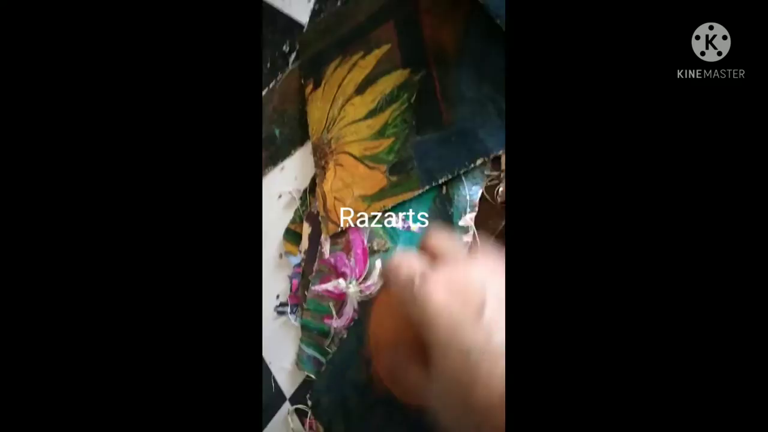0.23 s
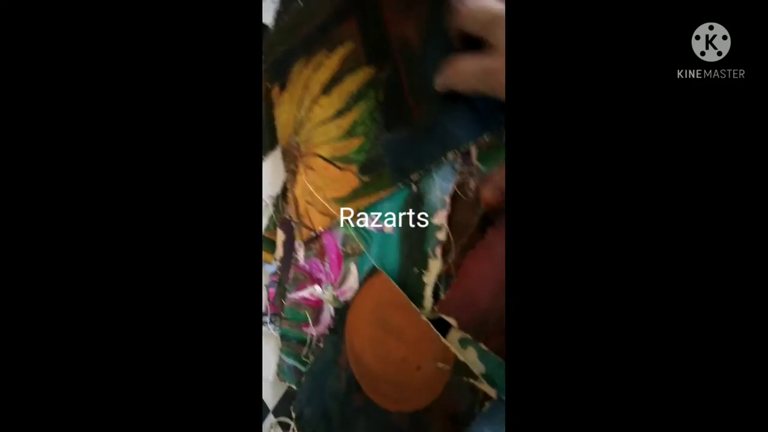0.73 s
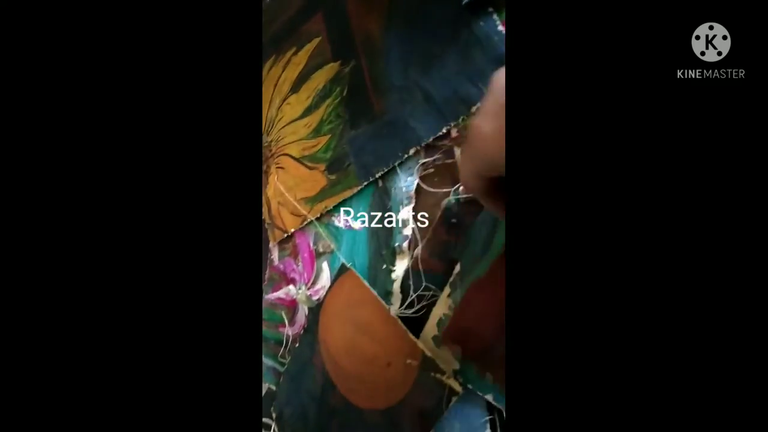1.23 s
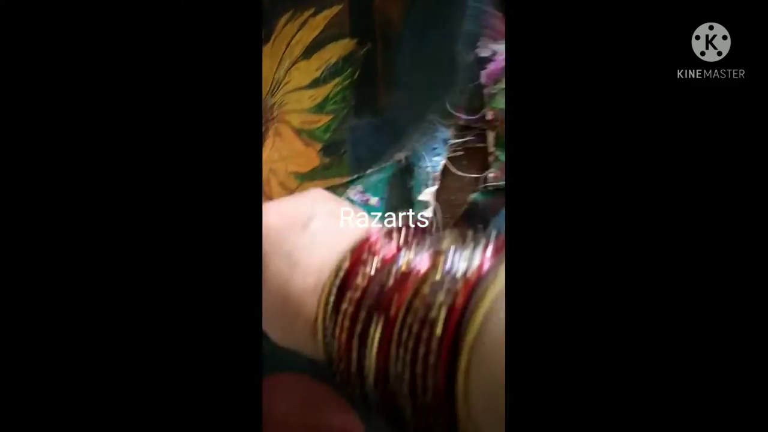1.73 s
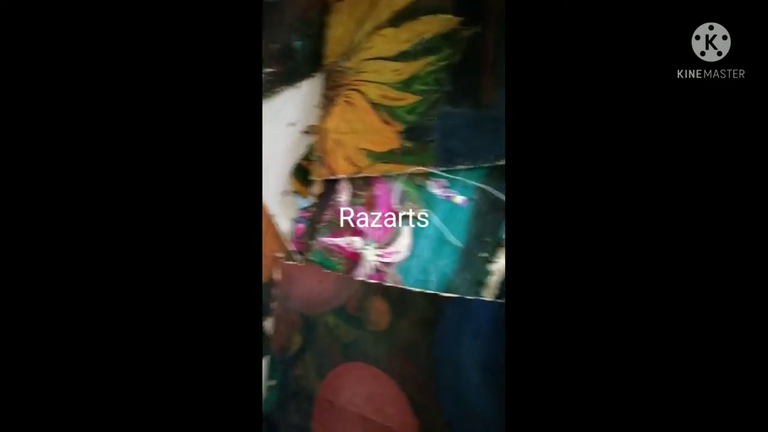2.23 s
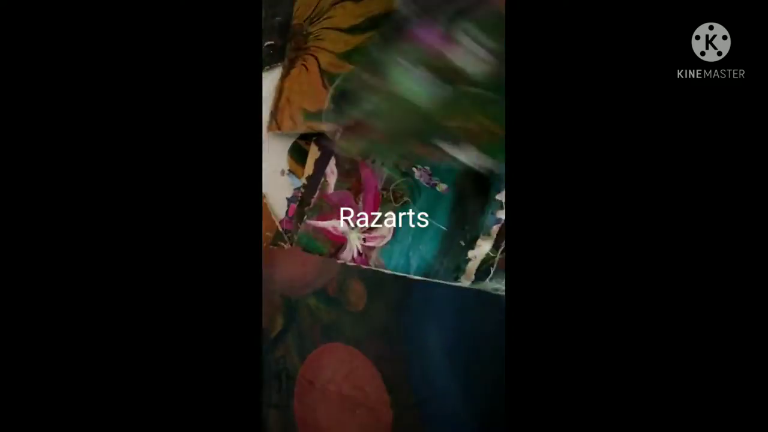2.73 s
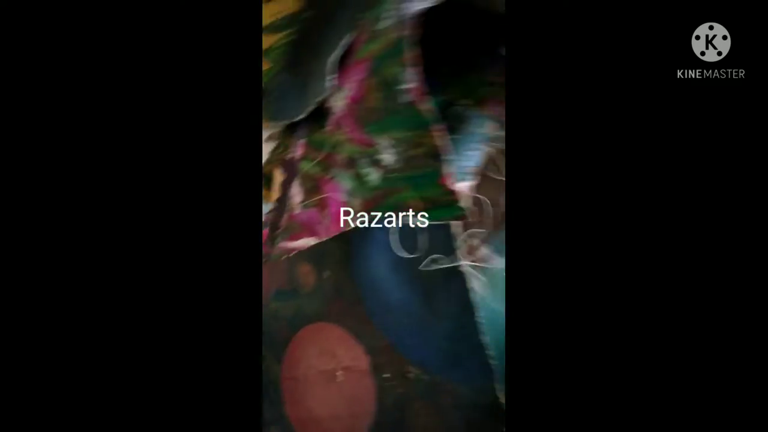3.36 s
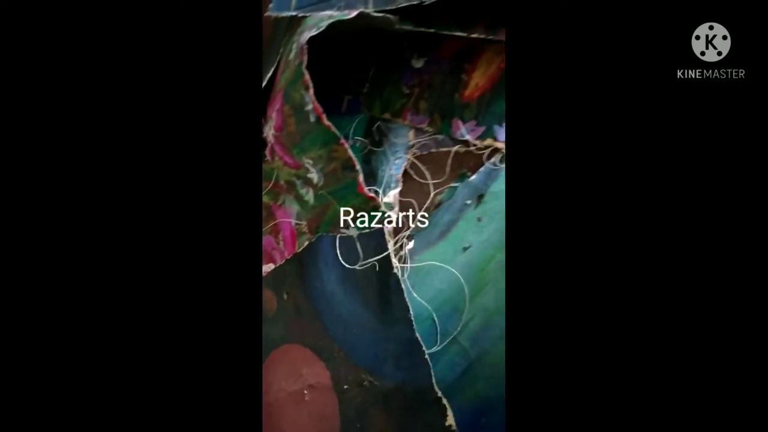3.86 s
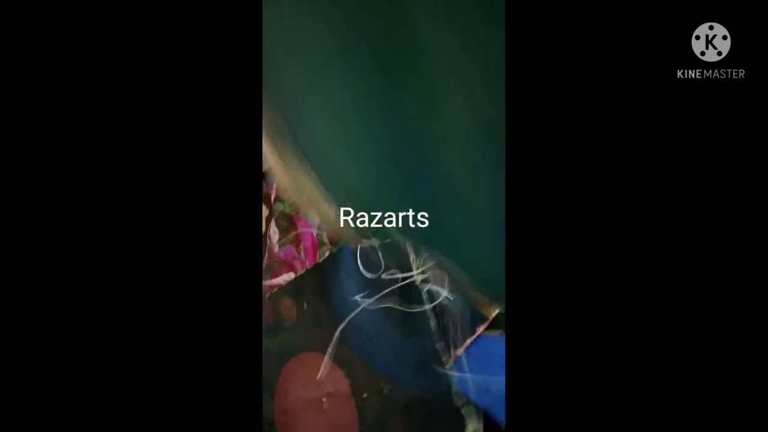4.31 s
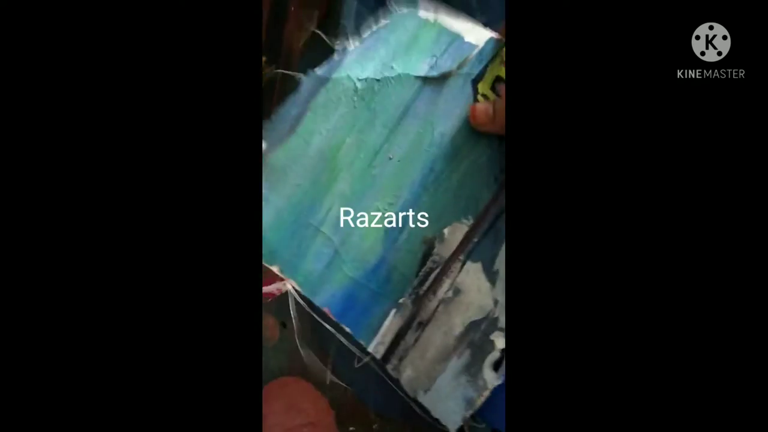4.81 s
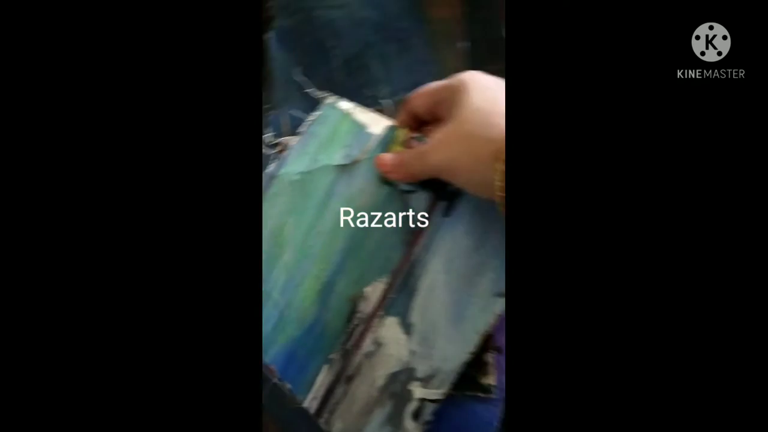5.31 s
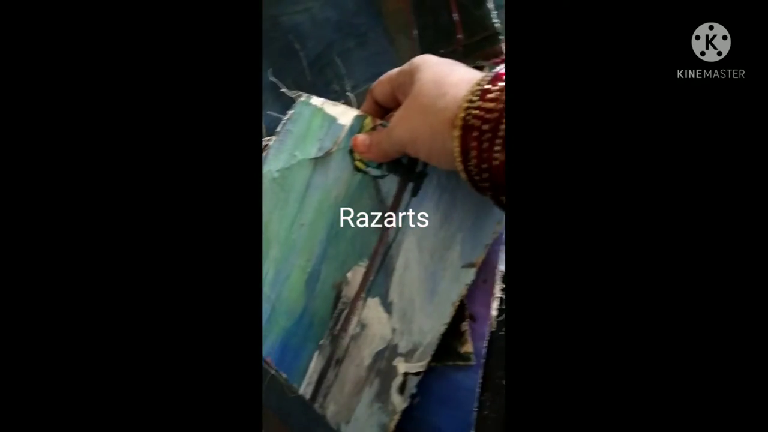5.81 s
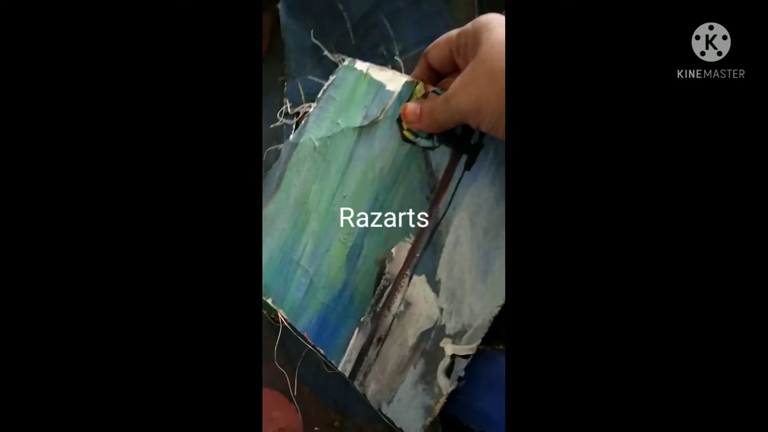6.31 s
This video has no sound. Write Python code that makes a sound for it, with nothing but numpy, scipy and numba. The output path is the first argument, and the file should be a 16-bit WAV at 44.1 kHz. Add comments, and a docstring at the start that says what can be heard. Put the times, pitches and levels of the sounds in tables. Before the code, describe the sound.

Silence for about 0.35 seconds, then a quick fade-in to a small room with a low, soft drone and faint motor hum. Stiff painted canvas is dragged close to a stereo microphone in irregular hissing, scraping tugs. A bird whistles outside at 0.55-0.85, slightly echoing. Hard dry snaps come at 1.05-1.25, with low sheet knocks near 0.9 and 1.2. From 1.83 to 2.3 thin glass bangles rattle past in one bright, dense rush. Scratchy rubs and small knocks continue; thread and paint-crust snaps gather from 2.9, crisp and mostly left, busiest at 3.5-4.3. The bird calls again at 4.4-4.65. A firmer double thump lands at 4.74 with more crackles, then handling dwindles after 5.0. A tiny last tick at 5.25 leaves only quiet room drone until the end around 6.5.

```python
"""Stiff painted canvas is pulled in scraps from a pile, close up: banded click noise hisses and scrapes under drag and tugs.
Fibres and paint crust snap as short rings, sheets thump as low knocks, and glass bangles rattle past once as a rush of rings.
A bird calls twice outside the window in gliding sines, over a room drone of coloured noise and hum.
After a silent start the sound fades in."""
import sys
import numpy as np
from scipy import signal
from scipy.fft import rfft, irfft
from scipy.io import wavfile
from scipy.ndimage import uniform_filter1d
from numba import njit

SR = 44100
rng = np.random.default_rng(int(sys.argv[2]) if len(sys.argv) > 2 else 0)


def persist_wave(psi):
    """Save psi, clipped to +-1, as 16-bit WAV."""
    counts = np.round(np.clip(psi, -1, 1) * 32767).astype(np.int16)
    wavfile.write(sys.argv[1], SR, np.atleast_2d(counts).T)


N = 289966


def undb(db):
    """Decibels to gain."""
    return 10 ** (np.asarray(db) / 20)


def unit(x):
    """Scale to rms 1."""
    return x / np.sqrt(np.mean(x ** 2))


def curves(table):
    """Columns joined by straight lines, one value a sample."""
    s, *columns = np.transpose(table)
    return [np.interp(np.arange(N) / SR, s, c) for c in columns]


def band(x, lo_hz, hi_hz, order=2):
    """Band-pass along time."""
    return signal.sosfilt(signal.butter(order, [lo_hz, hi_hz], "band", fs=SR, output="sos"), x)


def walk(rate):
    """Random levels held 1 / rate s and slewed twice; spread near 1."""
    k = int(SR / rate)
    steps = np.repeat(rng.standard_normal(N // k + 1), k)
    return 1.15 * uniform_filter1d(uniform_filter1d(steps, k), k)[:N]


def add(out, s, rise_s, fall_s, gain, bluntness):
    """Add a swell that peaks at s; rise and fall are the times of one e-fold."""
    first = max(int((s - 6 * rise_s) * SR), 0)
    last = min(int((s + 6 * fall_s) * SR), N)
    t = np.arange(first, last) / SR - s
    swell = np.exp(-np.where(t < 0, -t / rise_s, t / fall_s) ** bluntness)
    out[..., first:last] += gain[..., None] * swell


def tail(x, t60, wet_db):
    """Dry sound plus a dense decay, different at each port."""
    t = np.arange(int(t60 * SR)) / SR
    decay = np.exp(-np.log(1000) * t / t60)
    echo = unit(rng.standard_normal((2, len(t))) * decay) / np.sqrt(len(t))
    return x + undb(wet_db) * signal.fftconvolve(x * np.ones((2, 1)), echo, axes=1)[:, :N]


@njit
def rings(n, start, hz, t60, rise, left, right):
    """Sines that build up for rise s and then decay, one for each grain."""
    out = np.zeros((2, n))
    for g in range(len(start)):
        decaying_turn = np.exp(2j * np.pi * hz[g] / SR - np.log(1000.) / (t60[g] * SR))
        steady_turn = np.exp(2j * np.pi * hz[g] / SR)
        up = int(rise[g] * SR)
        z = 1. + 0j
        for i in range(start[g] - up, min(n, start[g] + int(t60[g] * SR))):
            z *= steady_turn if i < start[g] else decaying_turn
            y = z.imag * min(1., (i - start[g] + up + 1.) / (up + 1.)) ** 2
            out[0, i] += left[g] * y
            out[1, i] += right[g] * y
    return out


LEFT_LAG_S = 0.00018  # arrival of the shared clicks


def crackle(spread_db, alike, count):
    """Dense clicks of uneven size; part reaches both ports, the left a little later."""
    clicks = np.zeros((3, N))  # left alone, right alone, shared
    chance = rng.standard_normal((3, count))
    places = rng.integers(0, N, (3, count))
    size = chance * undb(spread_db * np.minimum(rng.exponential(size=chance.shape), 3.3))
    np.add.at(clicks, (np.arange(len(clicks))[:, None], places), size)
    both = np.array([np.roll(clicks[-1], int(LEFT_LAG_S * SR)), clicks[-1]])
    alike = np.clip(alike, 0, 1)
    return np.sqrt(1 - alike) * clicks[:-1] + np.sqrt(alike) * both


# registers of the fibre hiss, each with a flicker of its own: low_hz [Hz], high_hz [Hz], level_db [dB]
HISS_REGISTERS = [(4050, 6360, -9.5), (6460, 9970, -4), (10500, 16500, -5.5)]


def canvas():
    """Stick-slip crackle of the weave in several registers; breaking fibres click in all of them at once."""
    high, middle, low = handling() * undb(1.12 * walk(25.164))
    fibres = unit(crackle(3.8, 0.28, count=12000)) * undb(2.0 * walk(60))

    def weave(share, spread_db, alike, count):
        """Common fibre clicks plus a crackle of the register's own."""
        return share * fibres + unit(crackle(spread_db, alike, count=count))

    grit = weave(.75, 3.8, .25, count=45000) * undb(1.5 * walk(45) + 1.5 * walk(220))
    hiss = 0
    for k, (low_hz, high_hz, level_db) in enumerate(HISS_REGISTERS):
        register = unit(band(grit, low_hz, high_hz)) * undb(level_db + 1.8 * walk(35))
        hiss = hiss + (-1) ** k * register  # polarity alternates between registers
    scrape = -unit(band(weave(0.54, 1.8, 0.26, count=40000), 2130, 4380)) * undb(3.15 * walk(40))
    rasp = unit(band(weave(0.58, 2.6, 0.24, count=20000), 1410, 1880)) * undb(-11.0 + 3.0 * walk(22))
    body = unit(band(weave(0.53, 3.6, 0.7, count=16000), 427, 1430)) * undb(2.2 * walk(29.92))
    flap = unit(band(crackle(1.6, 1.0, count=4000), 152, 355)) * undb(-7.5 + 4.7 * walk(11))
    rub = swishes() * (scrape + undb(1.0) * hiss + undb(-4.5) * body)
    creases = crumple(middle.mean(axis=0))
    return high * hiss + middle * scrape + low * (body + flap + rasp) + rub + creases


# steady drag of the sheet over the pile:
# time_s [s], hiss_db [dB], scrape_over_hiss_db [dB], body_over_hiss_db [dB]
DRAG_CURVE = [(0.44, -53.5, -4, -10), (0.72, -43.5, 11, -4.5), (0.84, -48, 0, -7), (1.0, -45.5, -32, 2.5),
              (1.25, -43, 1.5, -7), (1.6, -49.5, 5, 0.5), (1.85, -52, 3, -5), (2.15, -53, 12.5, -23),
              (2.3, -44.5, 0.5, -2), (2.6, -41.5, 3.5, -3), (3.1, -46.5, 0.5, -0.5), (3.5, -52.5, -3, -13),
              (3.82, -51.5, 1, -6), (3.9, -43.5, 9, -2.5), (4.1, -42.5, 4, 1.5), (4.3, -45, -2, -6),
              (4.55, -43.5, 5.5, -11), (4.71, -54, 9, 0), (4.9, -48.5, 8, 5), (4.97, -57.5, 9, 11.5),
              (5.04, -57, 6.5, 2), (5.12, -67, 9, 1.5), (5.3, -68.5, 9, -3)]
# tugs at the cloth: peak_s [s], hiss_db [dB], rise_ms [ms], fall_ms [ms],
# scrape_over_hiss_db [dB], body_over_hiss_db [dB], left_minus_right_db [dB]
CLOTH_TUGS = [(0.483, -38, 2.1, 15, -4, -23, -1), (0.643, -32.5, 60, 33, -14, -21.5, -1),
              (0.9, -30, 18, 40, 7.5, -5.5, -0.5), (0.996, -33.5, 4.6, 5.4, -18, -13, -6),
              (1.063, -34.5, 37, 54, 8, -24, 3), (1.227, -35, 11, 2, 2, -15, -2),
              (1.335, -40, 14, 60, 4, -20, 1), (1.425, -33.5, 60, 16, -0.5, -11, 2),
              (1.595, -37, 2.3, 6, 2, -6, -3), (1.656, -41, 18, 20, 0, -3.5, 3),
              (1.781, -37.5, 68, 20, 0, -1.5, 2.5), (1.857, -27, 11, 85, -2, -21, 1),
              (1.992, -47, 42, 85, 5, -38, 5), (2.176, -34, 61, 40, 2.5, -38, -1),
              (2.337, -33, 19, 26, 6.5, -3, 1.5), (2.51, -35, 21, 23, -3, -6.5, -0.5),
              (2.625, -42, 22, 20, 8, -3.5, 0), (2.714, -35, 38, 51, -1.5, -8.5, 0),
              (2.93, -37.5, 6.5, 83, -8, -35, 1), (3.07, -44.5, 85, 8.6, 3.5, -7.5, -1),
              (3.213, -36, 40, 30, 2.5, -5, 0), (3.311, -45, 3.8, 26, 1.5, 7, -2),
              (3.441, -39, 38, 22, 2.5, -1, 1), (3.545, -33, 19, 23, -1.5, -11, 0),
              (3.666, -40.5, 18, 4, 1, 1, -1), (3.772, -43.5, 8.7, 10, 9.5, -8, 0.5),
              (3.864, -37.5, 15, 7.5, 6, -18, 1), (4.118, -43, 3, 12, -18, -8, 2),
              (4.161, -34, 16, 3.2, -5, -4.5, 4), (4.21, -42.5, 21, 35, -2, -12, 4),
              (4.316, -39, 7.9, 7.3, -10, -7, 0), (4.385, -38.5, 26, 35, -7.5, -3.5, -5),
              (4.63, -42.5, 11, 2.4, 3, -25, 4), (4.656, -48, 5.8, 5.7, -1, -27, -1.5),
              (4.735, -42, 1.4, 24, 1, 6.5, -4), (4.789, -36.5, 31, 27, 6.5, -1, 2),
              (4.836, -41.5, 4.9, 36, -9, -18, -6), (4.94, -47, 44, 16, -11, -12, -2),
              (5.234, -63, 3.6, 4, 12, 2, 3)]
TUG_BLUNTNESS = 1.275  # 1 = pointed swell, 2 = round bell


def handling():
    """Gains of hiss, scrape and body at both ports: a steady drag plus the tugs."""
    hiss_db, scrape_db, body_db = curves(DRAG_CURVE)
    dragging = np.arange(N) / SR < DRAG_CURVE[-1][0]
    layers = undb([hiss_db, hiss_db + scrape_db, hiss_db + body_db])
    out = dragging * layers[:, None] * np.ones((2, 1))
    for s, hiss_db, rise_ms, fall_ms, scrape_db, body_db, pan_db in CLOTH_TUGS:
        layers = undb([hiss_db, hiss_db + scrape_db, hiss_db + body_db])
        gain = np.outer(layers, undb([pan_db / 2, -pan_db / 2]))
        add(out, s, max(rise_ms, 1) / 1000, max(fall_ms, 1) / 1000, gain, TUG_BLUNTNESS)
    return out


def crumple(drag, count=1500):
    """Small creases pop while the sheet is dragged, each with its own pitch and length."""
    start = rng.integers(SR // 2, N, count)
    pitch, length, side = rng.standard_normal((count, 3)).T
    hz = np.clip(2800 * np.exp(.6 * pitch), 1500., 12000.)
    t60 = 14 * np.exp(0.5 * length) / hz
    size = drag[start] * undb(-5.0 + 3.0 * np.minimum(rng.exponential(size=count), 3.0))
    return rings(N, start, hz, t60, 2.55 / hz, size * undb(4.3 * side), -size * undb(-4 * side))


# single snaps of threads and paint crust: start_s [s], level_db [dB], ring_hz [Hz],
# left_minus_right_db [dB], ring_cycles [cycles to -60 dB, at least 1], swish_db [dB]
THREAD_SNAPS = [(1.056, -16, 3360, -2, 18, -33), (1.08, -18, 3000, 1, 10, -38),
                (1.152, -19, 4500, 4, 7, -49), (1.155, -12, 5200, 4, 8, -35),
                (1.182, -32, 2750, -1, 4, -29.5), (1.219, -13, 5100, 7, 7.3, -37),
                (1.5938, -19, 3080, -4, 5.5, -46), (1.766, -23, 2530, 3, 4, -40),
                (2.498, -17.5, 2230, -2, 9.7, -38), (2.862, -30, 2680, 4, 6, -36.5),
                (2.893, -22, 3500, 4, 16, -44), (2.92, -28, 3380, 8, 8, -41), (2.947, -23, 3300, 4, 6, -43),
                (2.978, -23, 3000, 4, 5, -47), (3.0006, -15, 3060, 8, 9.2, -40),
                (3.0848, -20.5, 2650, 7, 11, -33), (3.338, -25, 2600, 2, 5, -41),
                (3.477, -30, 9500, 2, 5, -45), (3.5206, -32, 3690, 2.5, 4, -43),
                (3.553, -12, 3210, 7.5, 22, -42), (3.583, -31, 2300, 5, 5.5, -48),
                (3.602, -27, 3350, 10, 5, -52), (3.615, -25, 5200, 6, 6, -60),
                (3.654, -19, 3370, 14, 4.4, -54), (3.723, -29, 2620, 11, 3, -58),
                (3.7745, -25, 2980, 10.5, 20, -50), (3.811, -20, 6500, 3, 5.5, -42),
                (3.8306, -27, 3400, 10, 3, -41), (3.86, -18, 3600, 6, 11, -40),
                (3.898, -11.5, 3320, 7, 13, -34), (3.9075, -19, 2650, 8, 20, -54),
                (3.914, -21, 2650, 9, 22, -56), (3.937, -11.5, 2240, 3, 3.6, -33.5),
                (4.0042, -16, 2390, 7, 4.6, -39), (4.1177, -15.5, 2770, 4, 8.5, -30),
                (4.163, -11, 4360, 11, 10, -34), (4.194, -26, 7040, -3, 4, -32),
                (4.217, -30, 9000, 0, 4, -41), (4.2963, -26, 4590, 7, 3, -37),
                (4.629, -28, 4950, 3, 4, -46), (4.7377, -18.5, 3000, 7, 8, -53),
                (4.767, -21, 2000, 3, 6, -39), (4.7872, -20.5, 2650, 10, 18, -48),
                (4.836, -13.5, 7900, 13, 7.1, -45), (4.912, -26, 2600, 5, 5.4, -58),
                (4.949, -34, 2300, 3, 5, -58), (4.968, -31, 1500, -2, 3.9, -61),
                (5.2455, -32, 2820, 13, 3.4, -44)]
TICK_DB, OVERTONE_DB, THUD_DB = -18, -13, -23  # parts of a snap against its ring
SNAP_LAG_S = .00005  # left after right


def snaps():
    """Snaps ring a few cycles, with overtone, sharp tick and dull thud, smeared by the folds around."""
    s, db, hz, pan_db, cycles, _ = np.transpose(THREAD_SNAPS)
    t60 = np.maximum(cycles, 1) / hz
    start, left, right = (s * SR).astype(np.int64), undb(db + pan_db / 2), undb(db - pan_db / 2)
    ring = rings(N, start, hz, t60, 1.04 / hz, left, right)
    over = rings(N, start, 2.16 * hz, 0.52 * t60, 3.1 / hz, left, right)
    tick = rings(N, start, 8800.0 + 0 * s, 0.00061 + 0 * s, 0.00035 + 0 * s, left, right)
    thud = rings(N, start, 0.53 * hz, 0.59 * t60, 0.81 / hz, left, right)
    both = ring + undb(OVERTONE_DB) * over + undb(TICK_DB) * tick + undb(THUD_DB) * thud
    lagged = np.array([np.roll(both[0], int(SNAP_LAG_S * SR)), both[1]])
    return tail(lagged, .006, -11)


SWISH_RISE_S, SWISH_FALL_S = .002, .002


def swishes():
    """Gain of the short rub that leads up to each snap and dies after it."""
    out = np.zeros(N)
    for s, *_, swish_db in THREAD_SNAPS:
        add(out, s, SWISH_RISE_S, SWISH_FALL_S, undb(swish_db), 2)
    return out


# sheets knocking on the pile: start_s [s], level_db [dB], ring_hz [Hz]
SHEET_THUMPS = [(0.894, -22, 574), (0.918, -20.5, 627), (1.179, -24.5, 590), (1.889, -27, 348),
                (2.208, -25.5, 588), (2.226, -20.5, 616), (2.335, -21, 1000), (2.5, -23, 975),
                (2.681, -25.5, 646), (2.965, -25, 650), (3.311, -27.5, 674), (3.336, -28, 590),
                (3.762, -28, 345), (4.151, -25.5, 576), (4.244, -25.5, 676), (4.7346, -17, 850),
                (4.739, -16.5, 470), (4.765, -23.5, 667), (4.786, -22.5, 785), (4.866, -29, 880),
                (4.966, -35, 540)]
THUMP_T60_S = 0.022


def thumps():
    """A low knock with a shorter, higher slap on top."""
    s, db, hz = np.transpose(SHEET_THUMPS)
    start, t60 = (s * SR).astype(np.int64), THUMP_T60_S + 0 * s
    knock = rings(N, start, hz, t60, 0.3 / hz, undb(db - 3.0), undb(db + 2.5))
    slap = rings(N, start, 1.45 * hz, 0.24 * t60, 0.44 / hz, undb(db), undb(db))
    return knock + undb(2.5) * slap


# course of the bangle rattle: time_s [s], level_db [dB], middle_pitch_hz [Hz]
BANGLE_RATTLE = [(1.818, -63, 5000), (1.83, -25, 4960), (1.846, -16.5, 5570), (1.852, -11.5, 5930),
                 (1.89, -22.5, 6100), (1.935, -21, 5700), (1.95, -15, 6150), (1.985, -12.5, 6500),
                 (2.02, -17, 6500), (2.085, -24, 5960), (2.11, -18, 5300), (2.145, -16.5, 4800),
                 (2.172, -17.5, 4350), (2.22, -22, 4740), (2.3, -32.5, 4460)]
# ring modes of the glass: pitch_hz [Hz], relative_level_db [dB], t60_s [s, before shortening]
GLASS_MODES = [(3050, 4, 0.03), (3300, 1.5, 0.093), (3780, -5.5, 0.18), (3840, -5, 0.19), (3920, 1, 0.039),
               (4310, -1, 0.27), (4980, -3, 0.13), (4870, -7, 0.083), (5700, -19, 0.068), (5370, -12, 0.14),
               (5800, -1.5, 0.074), (6550, -0.5, 0.13), (6400, -1, 0.21), (7660, -6, 0.098),
               (7170, -0.5, 0.11), (7640, -2.5, 0.073), (8070, -7, 0.066), (9600, -2, 0.085),
               (10200, 1.5, 0.071), (12500, 2, .04)]


def bangles(count=11000):
    """Thin rings clink in a dense rush; those pitched near the middle are struck hardest."""
    level_db, middle_hz = curves(BANGLE_RATTLE)
    first, last = BANGLE_RATTLE[0][0], BANGLE_RATTLE[-1][0]
    start = ((first + (last - first) * rng.random(count)) * SR).astype(np.int64)
    hz, db, t60 = np.array(GLASS_MODES)[rng.integers(0, len(GLASS_MODES), count)].T
    detune, left, right = rng.standard_normal((count, 3)).T
    damped = rng.random(count) < .75  # held against the wrist: a short, loose tick
    hz = np.clip(hz * np.exp(np.where(damped, .15, .003) * detune), 1500., 15000.)
    t60 = np.where(damped, .012, 0.44 * t60)
    off_db = -7 * (np.log(hz / middle_hz[start]) / np.where(damped, .55, .22)) ** 2
    size = undb(level_db[start] + db + off_db + np.where(damped, -9, -12))
    return rings(N, start, hz, t60, 2.5 / hz, size * left, size * right)


# bird notes: start_s [s], length_s [s], first_hz [Hz], held_hz [Hz], last_hz [Hz],
# level_db [dB, before the throb], peak_place [0-1 of the length]
BIRD_NOTES = [(0.562, 0.013, 3180, 3290, 3370, -30, 0.5), (.58, 0.043, 3480, 3670, 3660, -30, 0.7),
              (0.612, 0.011, 3390, 3330, 3250, -29.5, 0.4), (0.632, 0.024, 3460, 3170, 3160, -33.5, 0.5),
              (0.678, 0.035, 1990, 2120, 2150, -41.5, 0.7), (0.704, 0.015, 3060, 2960, 2830, -35.5, .5),
              (0.672, .014, 4750, 4600, 4500, -41, .5), (0.723, 0.13, 2710, 2752, 2750, -31, 0.33),
              (0.738, 0.112, 2630, 2650, 2700, -34.5, 0.1), (4.41, 0.046, 3640, 3590, 3480, -36.5, 0.7),
              (4.475, 0.042, 2370, 2385, 2380, -38, 0.4), (4.494, 0.024, 3900, 4110, 4560, -39, 0.1),
              (4.514, 0.024, 3890, 3776, 3620, -31.5, 0.3), (4.524, 0.012, 2880, 2860, 2830, -28, 0.3),
              (4.536, 0.015, 3180, 3140, 3000, -31, 0.3), (4.547, 0.035, 2934, 2947, 2920, -27.5, 0.27),
              (4.582, 0.029, 2900, 2920, 2860, -28, 0.5), (4.61, 0.036, 2515, 2200, 1770, -44, 0.1)]
GLIDE_IN_S, GLIDE_OUT_S = 0.0233, 0.019  # at most half a note each
NOTE_START_DB, NOTE_END_DB = -5.5, -5  # ends of a note against its peak
SLAP_S, SLAP_DB = 0.11, -17  # echo off a facing wall
YARD_T60_S, YARD_DB = .3, -1


def bird():
    """Whistles glide into and out of a held pitch, waver and throb, blurred by the walls outside."""
    out = np.zeros(N)
    waver = 1 + .014 * walk(260)
    throb = undb(6 + walk(60) + 2.5 * walk(200) + 3 * walk(1200))
    for s, length, first_hz, held_hz, last_hz, db, peak in BIRD_NOTES:
        t = np.arange(int(length * SR)) / SR
        now = slice(int(s * SR), int(s * SR) + len(t))
        glides = [0, min(GLIDE_IN_S, length / 2), length - min(GLIDE_OUT_S, length / 2), length]
        hz = np.interp(t, glides, [first_hz, held_hz, held_hz, last_hz])
        arc = [0, np.clip(peak, .05, .95), 1]
        level_db = db + np.interp(t / length, arc, [NOTE_START_DB, 0, NOTE_END_DB])
        gate = np.clip(np.minimum(t, length - t) / 0.0016, 0, 1)
        whistle = np.sin(2 * np.pi * np.cumsum(hz * waver[now]) / SR)
        out[now] += gate * throb[now] * undb(level_db) * whistle
    out = out + undb(SLAP_DB) * np.roll(out, int(SLAP_S * SR))
    return tail(out * undb(np.array([[1.5], [-1.5]])), YARD_T60_S, YARD_DB)


# colour of the room drone: pitch_hz [Hz], relative_density_db [dB per Hz]
ROOM_COLOUR = [(18, -91), (30, -48), (70, -25), (86, -44), (145, -12), (170, -12), (204, 0), (415, -9.5),
               (461, -17), (866, -17), (1350, -23), (1760, -19.5), (2750, -27), (13000, -35.5),
               (16000, -33.5)]
# how alike the drone is at the two ports: pitch_hz [Hz], likeness [0-1]
PORT_LIKENESS = [(60, 0.9), (130, 0.95), (290, 0.91), (640, 0.25), (1410, 0), (3100, 0.27), (6820, 0),
                 (15000, 0.45)]
# motor droning on the mains: pitch_hz [Hz], level_db [dB rms, before the waver]
MOTOR_HUM = [(100, -77), (202, -63), (301, -68.5)]
ROOM_DB, HUM_WAVER_DB = -47, 3.0


def room():
    """Coloured drone, alike at both ports in the bass, with an unsteady motor hum."""
    log_f = np.log(np.maximum(np.fft.rfftfreq(N, 1 / SR), 1))
    colour_hz, colour_db = np.transpose(ROOM_COLOUR)
    colour = undb(np.interp(log_f, np.log(colour_hz), colour_db))
    alike_hz, likeness = np.transpose(PORT_LIKENESS)
    alike = np.clip(np.interp(log_f, np.log(alike_hz), likeness), 0, 1)
    mid, side = rfft(rng.standard_normal((2, N)))
    pair = np.sqrt(1 + alike) * mid + np.sqrt(1 - alike) * side * np.array([[1], [-1]])
    out = unit(irfft(colour * pair, N)) * undb(ROOM_DB + 0.81 * walk(1.465))
    t = np.arange(N) / SR
    for hz, db in MOTOR_HUM:
        level = undb(db + HUM_WAVER_DB * walk(12.0))
        out = out + level * np.sqrt(2) * np.sin(2 * np.pi * hz * t)
    return out


LOW_CUT_HZ = 167


def scene():
    """Near sounds lose their deepest bass and get a little of the small room."""
    near = canvas() + snaps() + thumps() + bangles()
    near = signal.sosfilt(signal.butter(3, LOW_CUT_HZ, "high", fs=SR, output="sos"), near)
    return tail(near, 0.22, -11.5) + bird() + room()


# colour of the microphone ports: centre_hz [Hz], width_hz [Hz], left_minus_right_db [dB]
PORT_COLOURS = [(604, 92, -10), (3200, 810, 4.5)]
START_S, FADE_S, TOP_HZ = 0.34, 0.15, 15800


def record(dry):
    """Port colours, a fade-in from silence and the top cut."""
    out = dry
    for hz, width_hz, db in PORT_COLOURS:
        peak = band(out, hz - width_hz / 2, hz + width_hz / 2, order=1)
        out = out + (undb(np.array([[db], [-db]]) / 2) - 1) * peak
    out = out * np.clip((np.arange(N) / SR - START_S) / FADE_S, 0, 1)
    return signal.sosfilt(signal.ellip(10, .2, 80, TOP_HZ, fs=SR, output="sos"), out)


dry = scene()
out = record(dry)
persist_wave(out)
```